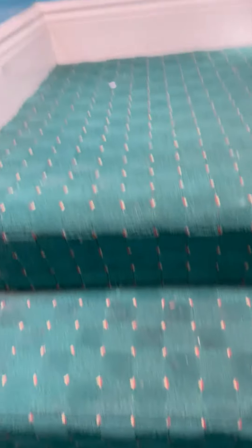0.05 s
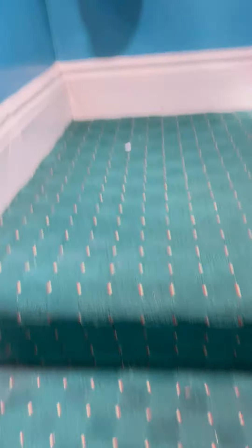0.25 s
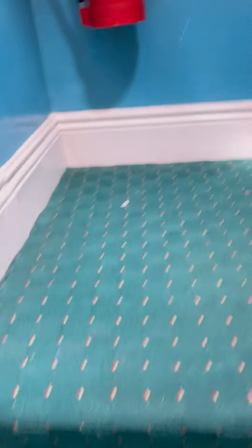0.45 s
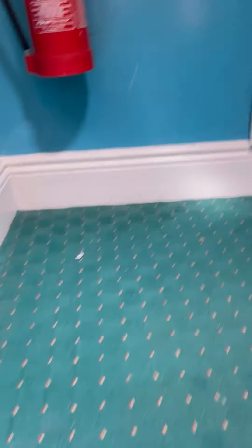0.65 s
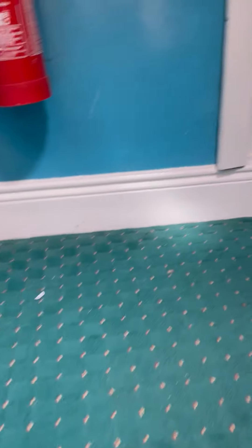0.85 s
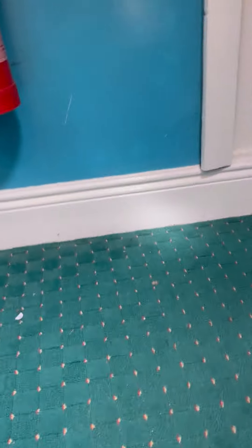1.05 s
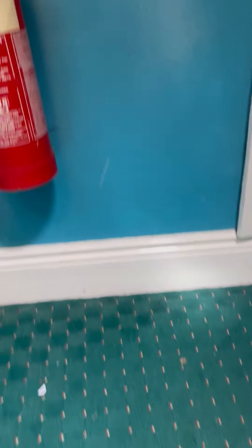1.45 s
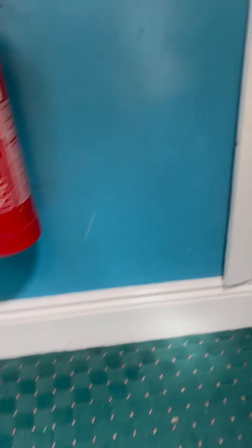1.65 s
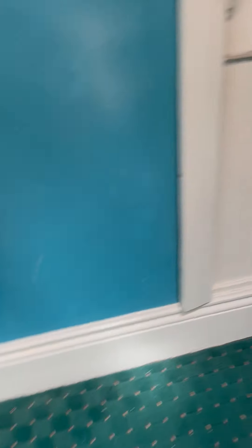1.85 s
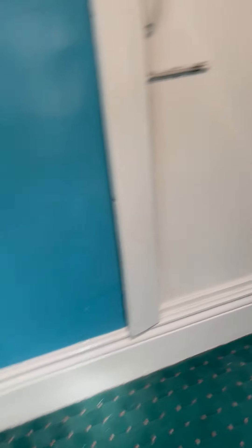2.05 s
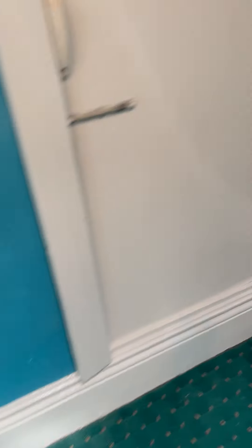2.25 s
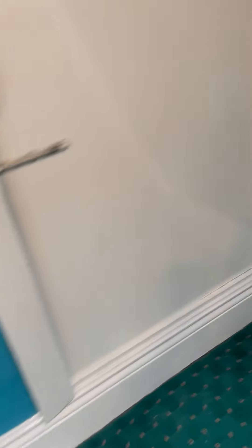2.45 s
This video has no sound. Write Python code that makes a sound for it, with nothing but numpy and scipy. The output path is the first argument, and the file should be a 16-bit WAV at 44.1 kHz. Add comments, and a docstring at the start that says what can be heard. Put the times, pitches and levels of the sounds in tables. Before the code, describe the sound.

Muffled footsteps thud up carpeted steps and onto a landing in a quiet, slightly echoing stairwell. The shoes click faintly and a light wooden knock comes before the last step, with close clothing rustle and low hiss throughout.

```python
"""A faint, dull low swell sounds over steady hiss and building rumble; clothes swish as a leg swings.
Then footsteps climb the last carpeted stairs and cross a landing. Each shoe taps the carpet, and the
body's weight thumps the wooden floor beneath, exciting its low modes; the stairwell reverberates briefly.
A flexing shoe clicks now and then, and one light hollow knock falls between two strides.
The stairwell's hum lingers after the last step."""
import sys
import numpy as np
from scipy import signal
from scipy.fft import rfft, irfft
from scipy.io import wavfile

SR = 44100
rng = np.random.default_rng(int(sys.argv[2]) if len(sys.argv) > 2 else 0)


def transcribe(signal):
    """Save signal, clipped to [-1, 1], as a 16-bit WAV file at the path in sys.argv[1]."""
    frames = np.atleast_2d(signal).T
    limited = np.clip(frames, -1, 1)
    pcm = np.round(limited * 32767).astype(np.int16)
    wavfile.write(sys.argv[1], SR, pcm)


N = 114660


def undb(db):
    """Amplitude ratio of a level in decibels."""
    return 10 ** (np.asarray(db) / 20)


def curve(points):
    """Spectral envelope: gain per frequency bin, interpolated in dB over log frequency."""
    hz, db = np.array(points, float).T
    return undb(np.interp(np.log(np.arange(N // 2 + 1) * SR / N + 1), np.log(hz), db))


def noise(colour):
    """Partially coherent stereo noise, rms 1: the bass alike in both ears, the treble wide."""
    # stereo width: f/Hz, side minus mid level/dB
    side_levels = [(30, -63), (60, -33), (125, -16.5), (250, -15.5), (500, -4), (1000, -0.5), (2000, -6),
                   (4000, -1.5), (12000, 8.5)]
    width = curve(side_levels)
    mid, side = rfft(rng.standard_normal((2, N)))
    left_right = mid + np.array([[1], [-1]]) * width * side
    x = irfft(left_right * curve(colour) / np.sqrt(1 + width ** 2), N)
    return x / x.std()


def since(start):
    """Seconds elapsed since an onset, zero before it."""
    return np.maximum(np.arange(N) / SR - start, 0)


def fall(t, t60):
    """Exponential damping: 60 dB down after t60 seconds."""
    return np.exp(-np.log(1000) * t / t60)


def blow(start, rise, t60):
    """Impact envelope: a linear rise, then exponential decay."""
    return np.minimum(since(start) / rise, 1) * fall(since(start + rise), t60)


def ring(start, hz, build, t60):
    """Normal mode: a damped sinusoid that builds up and dies away."""
    t = since(start)
    return np.sin(2 * np.pi * hz * t) * (1 - np.exp(-t / build)) * fall(t, t60)


def swells(rows):
    """Envelope of superposed Gaussian swells."""
    t = np.arange(N) / SR
    return sum(undb(db) * np.exp(-.5 * ((t - at) / half) ** 2) for at, half, db in rows)


def grain(rate_hz, depth_db):
    """Random amplitude modulation, rms 1: a quick unevenness of level."""
    flicker = np.interp(np.arange(N) * rate_hz / SR, np.arange(N), rng.standard_normal(N))
    gain = undb(depth_db * flicker)
    return gain / np.sqrt(np.mean(gain ** 2))


def background():
    """Stationary noise: a broadband hiss and the low rumble of the building."""
    # spectra: f/Hz, relative level/dB
    hiss_spectrum = [(200, 2.5), (500, 7), (1000, 5), (2000, 2), (3200, -2.5), (4800, -0.5), (7000, -13.5),
                     (10000, -46), (15500, -37)]
    building_spectrum = [(20, -5), (50, 1.5), (100, -2), (200, -13), (450, -21.5), (900, -25.5),
                         (2500, -64)]
    return undb(-68.5) * noise(hiss_spectrum) + undb(-63) * noise(building_spectrum)


def low_swells():
    """Modulated noise: faint, dull low swells; the stairwell's hum lingers after the last step."""
    # swells: t/s, half length/s, level/dB
    swell_rows = [(.02, 0.057, -56.5), (.66, 0.043, -70), (1.93, 0.12, -56.5), (2.43, 0.11, -56)]
    # their spectrum: f/Hz, relative level/dB
    dull_spectrum = [(25, -31), (50, 8.5), (85, 2), (130, -10), (185, -5.5), (280, -11.5), (450, -13.5),
                     (900, -20), (2500, -39.5)]
    return swells(swell_rows) * grain(rate_hz=140, depth_db=1.0) * noise(dull_spectrum)


def close_noise(colour):
    """Path difference: noise from below the phone reaches the left port first, plus a diffuse part."""
    # diffuse field: f/Hz, diffuse minus direct level/dB
    diffuse_levels = [(1000, 7), (4500, 0), (6000, -12), (8000, -7), (12500, -34)]
    port_lag_s = .000243
    share = curve(diffuse_levels)
    direct, *diffuse = rfft(rng.standard_normal((3, N)))
    delay = np.exp(-2j * np.pi * np.arange(N // 2 + 1) * SR / N * port_lag_s)
    left_right = np.array([direct, direct * delay]) + share * np.array(diffuse)
    x = irfft(left_right * curve(colour) / np.sqrt(1 + share ** 2), N)
    return x / x.std()


def clothes():
    """Sliding friction: fabric rubs all the time and swishes with each swing of a leg."""
    # leg swings: t/s at the fastest, half length/s, level/dB
    swings = [(.12, 0.1, -65), (.77, 0.073, -64), (1.3, 0.088, -65.5), (1.97, 0.084, -64.5),
              (2.6, 0.082, -63.5)]
    # fabric spectrum: f/Hz, relative level/dB
    fabric_spectrum = [(500, -7), (1500, -2.5), (3000, 3.5), (4500, 3.5), (6200, 4.5), (8000, 3),
                       (10000, -1.5), (12500, -0.5), (15500, -6.5)]
    steady_db = -72
    envelope = np.hypot(swells(swings), undb(steady_db))
    return envelope * grain(rate_hz=98, depth_db=0.8) * close_noise(fabric_spectrum)


def shoes():
    """Impact noise and reverberation: each contact knocks the boards, pats the carpet, scuffs its pile."""
    # shoe contacts: t/s, rise/s, knock level/dB, pat level/dB, scuff level/dB
    contacts = [(0.213, 0.0033, -39.5, -40.5, -62.5), (0.246, 0.013, -42.5, -58, -87),
                (0.372, 0.0089, -43, -48.5, -65.5), (0.429, 0.0071, -55, -55, -69),
                (0.486, 0.013, -51, -74, -80), (0.55, 0.0032, -59.5, -57, -83),
                (0.581, 0.0047, -51.5, -68, -87), (0.8, 0.0058, -41.5, -37.5, -64),
                (0.913, 0.0016, -38, -48, -81), (0.953, 0.018, -44.5, -50, -67.5),
                (1.046, 0.013, -51, -68.5, -69), (1.431, 0.0018, -47.5, -52.5, -69),
                (1.444, 0.018, -41, -49, -83), (1.526, 0.0018, -47, -58.5, -67),
                (1.597, 0.0043, -51, -73, -67.5), (1.757, 0.0036, -58, -47, -65),
                (2.083, .012, -50.5, -55, -75), (2.107, 0.0031, -47, -46, -67.5),
                (2.126, 0.0083, -44, -51, -71), (2.285, 0.0053, -54.5, -52.5, -69.5)]
    # spectra of the low knock, mid pat and bright scuff: f/Hz, relative level/dB
    knock = [(40, -25), (75, 0), (120, 1), (200, 0.5), (300, -8), (400, -4.5), (500, -13), (620, -17),
             (1200, -35), (6000, -83)]
    pat = [(100, -46), (250, -1), (420, 0.5), (570, -1.5), (650, -7), (780, -7.5), (910, -8), (1050, -12.5),
           (1300, -15), (2000, -26.5), (4500, -48), (9000, -77)]
    scuff = [(400, -43), (1200, -12), (2300, 1.5), (3200, -9), (4300, -4), (6500, -20), (12000, -42)]
    # spectrum, t60/s, relative level of the reverberation/dB
    parts = [(knock, 0.15, -8), (pat, 0.11, -10.5), (scuff, 0.21, -21.5)]
    room_build_s, room_t60_s = .015, 0.58
    out = 0
    for k, (colour, t60, room_db) in enumerate(parts):
        direct_power = room_power = 0  # incoherent sounds add in power
        for at, rise, *levels in contacts:
            gain = undb(levels[k])
            direct_power += (gain * blow(at, rise, t60)) ** 2
            room_power += (gain * blow(at, rise + room_build_s, room_t60_s)) ** 2
        out += np.sqrt(direct_power) * grain(rate_hz=345, depth_db=0.5) * noise(colour)
        out += undb(room_db) * np.sqrt(room_power) * noise(colour)
    return out


def boards(loads, modes):
    """Forced vibration: a soft push rings the floor, the longer the deeper; the house rumbles after it."""
    # spectrum of the shaken house: f/Hz, relative level/dB
    rumble_spectrum = [(25, -52), (38, 4), (55, 3), (100, -9), (140, -18), (185, -2), (240, -15),
                       (320, -13), (800, -61)]
    rumble_db = -13
    thumps, rumble_power = np.zeros(N), np.zeros(N)
    for at, db, length, pitch in loads:
        push = np.sin(np.pi * np.minimum(since(at) / length, 1))
        response = sum(undb(mode_db) * ring(0, hz * pitch, build, t60) for hz, mode_db, build, t60 in modes)
        thumps += undb(db) * signal.fftconvolve(push / push.sum(), response)[:N]
        rumble_power += (undb(db) * blow(at, rise=0.034, t60=0.8)) ** 2
    return thumps + undb(rumble_db) * np.sqrt(rumble_power) * noise(rumble_spectrum)


def body_weight():
    """Modal response: the walker's weight loads the stairs, then the landing, each with its own modes."""
    # loads: t/s, level/dB, length of the push/s, pitch factor of the boards at that spot
    stair_loads = [(.225, -37.5, .011, 0.86), (.314, -35.5, 0.0044, 0.98), (.386, -45, .006, 0.86),
                   (.56, -53, 0.0028, 1)]
    landing_loads = [(.917, -34, 0.0048, 1), (1.453, -37, 0.0043, 1.02), (1.526, -42.5, 0.0081, 1),
                     (1.915, -49.5, .012, 1.1), (2.131, -38, .0035, 1.08), (2.143, -29.5, .014, 1.02)]
    # floor modes: f/Hz before the pitch factor, relative level/dB, build-up/s, t60/s
    stair_modes = [(68.5, 4, 0.02, 0.59), (106.3, 7, 0.0013, 0.3), (125.8, -10.5, 0.0032, 0.33),
                   (157.6, -4, 0.0036, 0.51), (200.2, -10.5, 0.0093, 0.77)]
    landing_modes = [(52.43, 3.5, 0.024, 0.56), (95.6, 6, 0.0033, 0.23), (143, 2.5, 0.0053, 0.29),
                     (162.4, -4, 0.0035, 0.23), (188, -8.5, 0.004, 0.36)]
    return boards(stair_loads, stair_modes) + boards(landing_loads, landing_modes)


def shoe_clicks():
    """Band-limited transients: a shoe gives a tiny click as it flexes."""
    # clicks: t/s, centre f/Hz, level/dB
    clicks = [(0.548, 2220, -56.5), (1.427, 3780, -58.5), (1.755, 8950, -64.5)]
    skirt = 1.16 ** 4  # frequency ratio from the centre to 60 dB down
    out = 0
    for at, hz, db in clicks:
        band = [(hz / skirt, -60), (hz, 0), (hz * skirt, -60)]
        out += undb(db) * blow(at, rise=0.0013, t60=.05) * noise(band)
    return out


def hollow_knock():
    """Free vibration: hollow wood, lightly knocked, rings in a few damped modes."""
    # knock between two strides: t/s, level/dB
    knocks = [(1.757, -43.5)]
    # modes of the wood: f/Hz, relative level/dB, t60/s
    wood_modes = [(170.6, -10, .35), (194.4, 3.5, 0.26), (712, -6.5, 0.19), (792, -9.5, 0.19),
                  (1000, -18.5, 0.26)]
    return sum(undb(db + mode_db) * ring(at, hz, build=0.01, t60=t60)
               for at, db in knocks for hz, mode_db, t60 in wood_modes)


def scene():
    """Superposition: steps, clothes, low swells and the quiet stairwell add as sound pressures."""
    steps = shoes() + shoe_clicks() + hollow_knock() + body_weight()
    return steps + clothes() + low_swells() + background()


def record(dry):
    """Band limiting: the phone drops the deepest bass and cuts the highest treble."""
    bottom_hz, top_hz = 38, 15700
    x = signal.sosfilt(signal.butter(4, bottom_hz, "high", fs=SR, output="sos"), dry)
    return signal.sosfilt(signal.ellip(10, .2, 70, top_hz, fs=SR, output="sos"), x)


dry = scene()
out = record(dry)
transcribe(out)
```